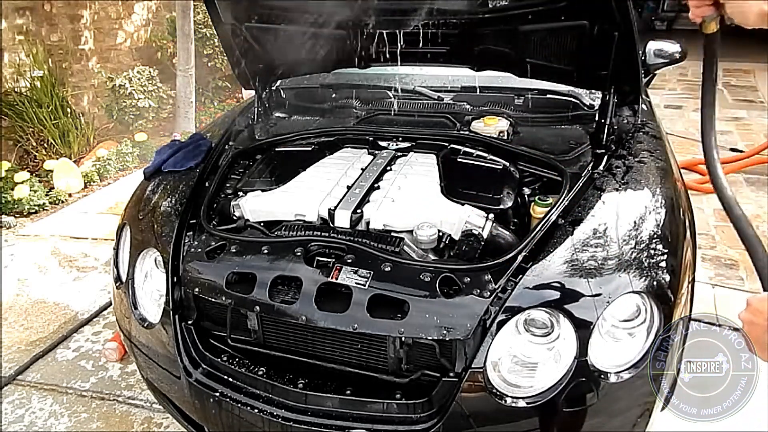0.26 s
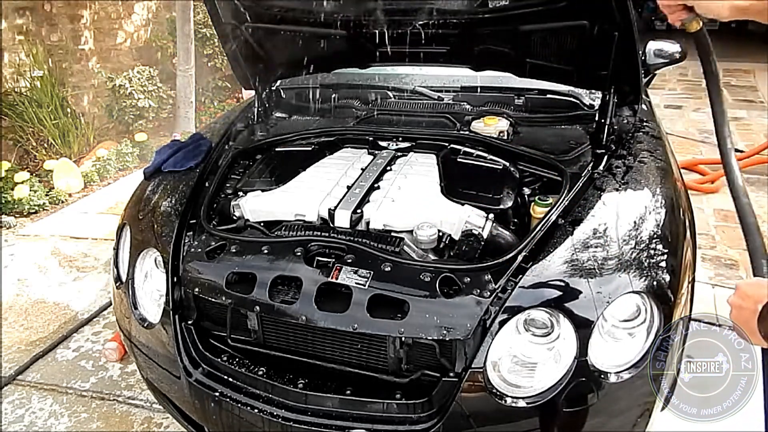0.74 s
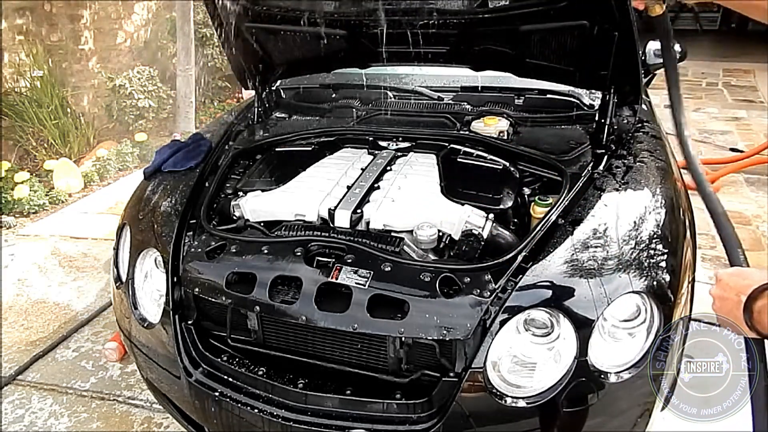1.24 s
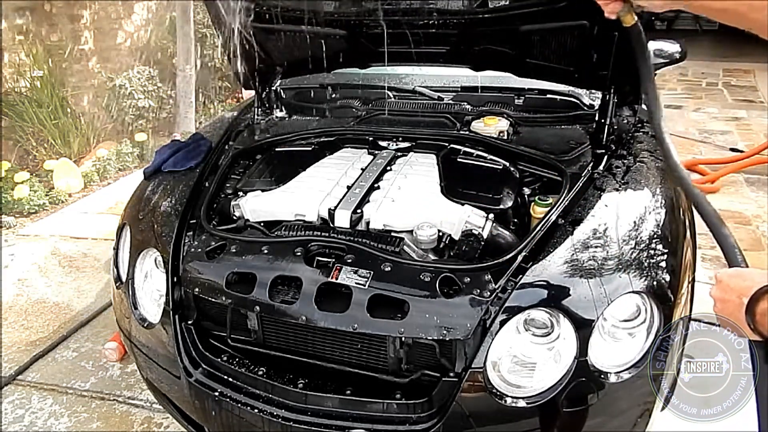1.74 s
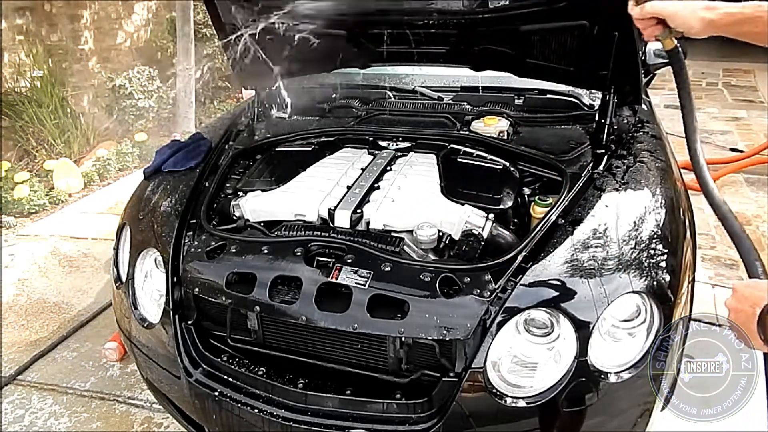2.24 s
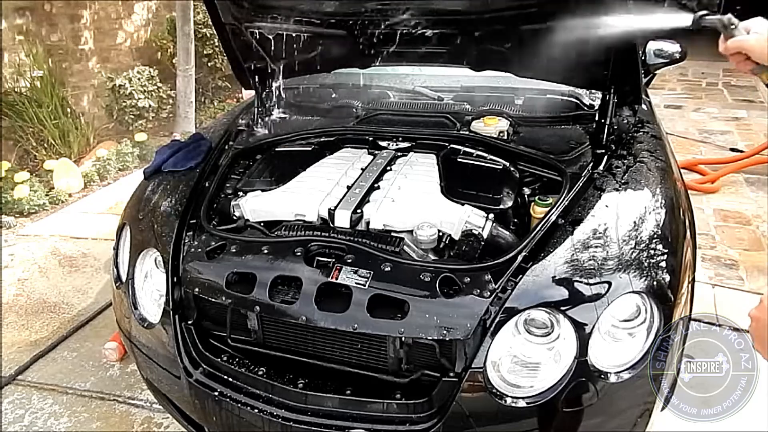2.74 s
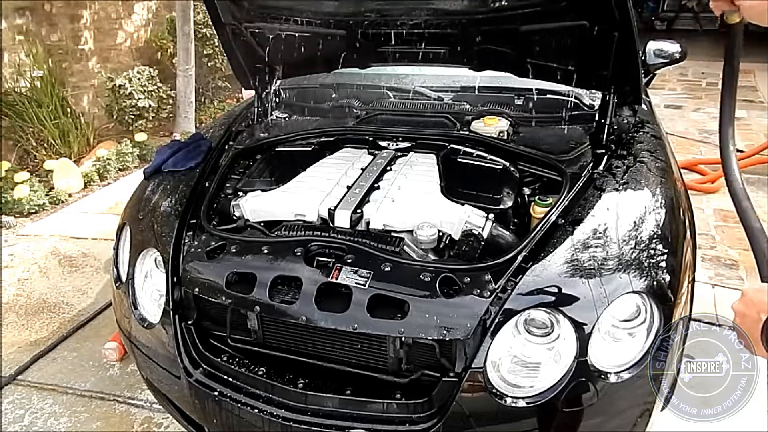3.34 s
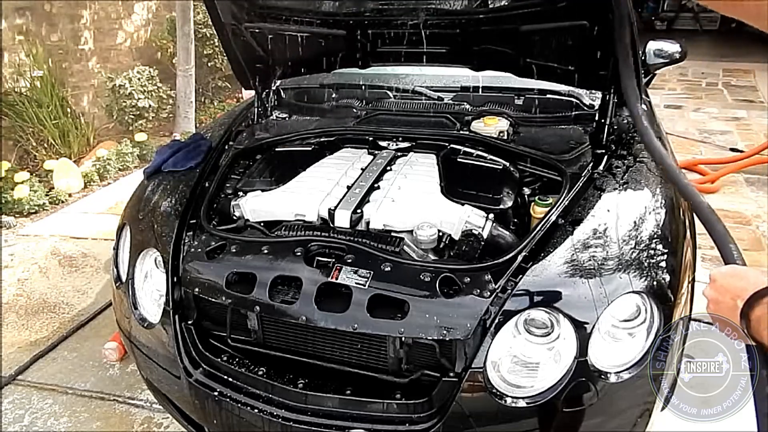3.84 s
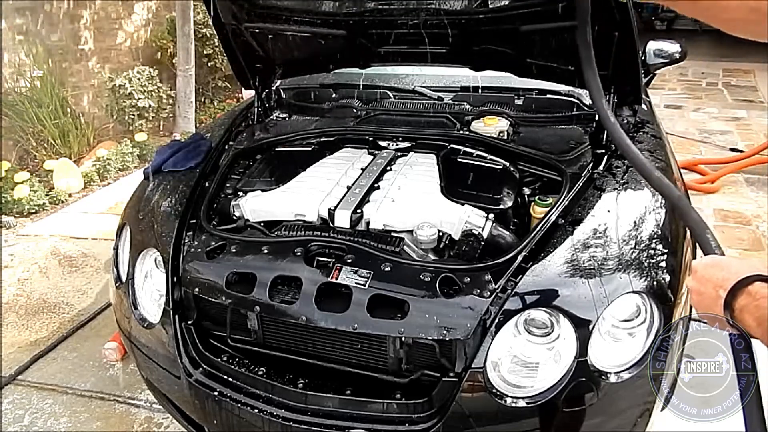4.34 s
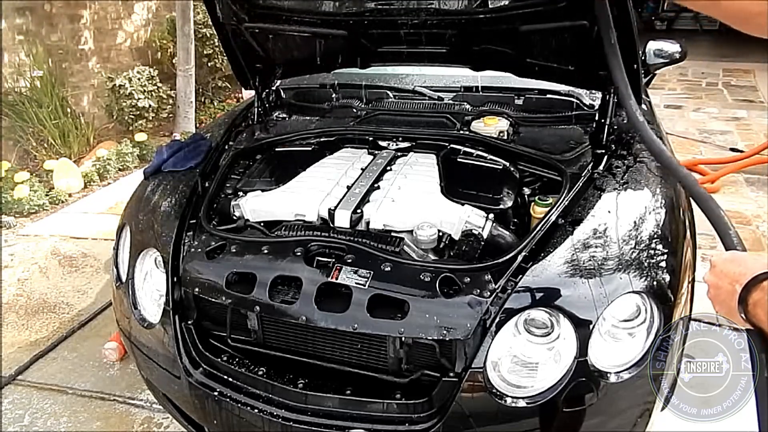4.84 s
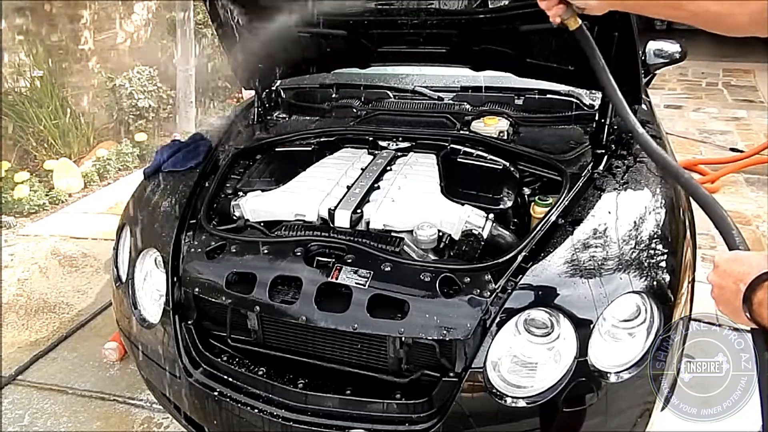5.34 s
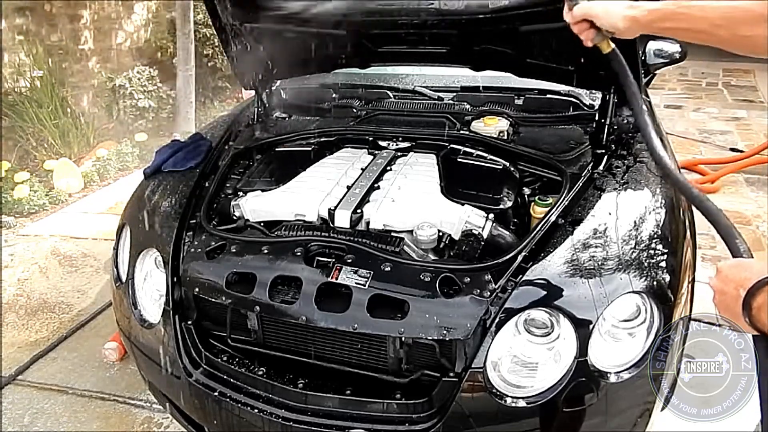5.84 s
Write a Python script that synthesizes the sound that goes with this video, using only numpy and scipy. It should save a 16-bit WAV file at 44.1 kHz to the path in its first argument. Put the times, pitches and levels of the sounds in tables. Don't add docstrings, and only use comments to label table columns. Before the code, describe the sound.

Continuous pressurised water strikes thin ribbed sheet metal in a driveway, heard close up. The hiss is rough and uneven, with quick swells as the jet hits pockets and short drops as it slips past gaps. The hollow panel drums and sings briefly in watery, unsteady tones. Early on there is more low boom; later it is brighter and more broken, with a few fat drops near the end.

```python
import sys
import numpy as np
from scipy import signal
from scipy.fft import rfft, irfft, next_fast_len
from scipy.io import wavfile
from scipy.ndimage import uniform_filter1d, map_coordinates

SR = 44100
rng = np.random.default_rng(int(sys.argv[2]) if len(sys.argv) > 2 else 0)


def convert_level_to_amplitude(level_db):
    exponent = np.asarray(level_db, float) / 20
    return 10 ** exponent


def store_pcm(level_fs):
    pcm = np.round(np.clip(level_fs, -1, 1) * 32767).astype(np.int16)
    wavfile.write(sys.argv[1], SR, np.atleast_2d(pcm).T)


N = 268348

# time in seconds, then force, hardness of impact,
# drive of the sheet and opening to the bay, all in dB.
JET_SWEEP = [(0.0, -1.4, 1.5, 4, 14.5), (0.4, 3.5, -0.7, 3, 7.5), (0.8, 0.2, -3.5, 1.5, 8),
             (1.2, 2.5, 0, 2, 7.5), (1.6, 1.5, 0, 2.5, 5), (2.0, 0.1, 1.6, 4, 14),
             (2.4, 4.5, -1.4, -3, 3.5), (2.8, -3, 1.2, 0.5, 3), (3.15, 1.5, 3.5, 0.5, -5),
             (3.55, -8.5, 0, -0.5, -2), (3.9, -0.5, 0, -2.5, -3.5), (4.2, 2, 0, 3, -4.5),
             (4.45, 1.5, -1, -3.5, -4), (4.75, 4.5, -1.4, -2.5, -4), (5.1, -3, -1, 4, -1.5),
             (5.4, 4, -0.5, -2.5, -12), (5.7, -4.5, 1.3, -2, -8), (6.08, 1.5, -1, -2.5, -6)]
# middle in seconds, length in seconds, gain in dB,
# depth in dB (into a pocket +, glancing -).
STRIKES = [(0.436, 0.011, 1.3, 7), (0.46, 0.07, 0.28, 0.5), (0.614, 0.018, 2.6, 3), (0.713, 0.18, 2.2, 0.5),
           (0.803, 0.016, 4, 10), (0.923, 0.016, 1.2, 4), (1.003, 0.05, 1.1, 0.5), (1.704, 0.018, 1.4, 8),
           (1.995, 0.068, 2.2, 0), (2.345, 0.028, 0.9, -2.5), (2.589, 0.018, 1.4, 5), (2.639, 0.19, 2, 2),
           (2.724, 0.12, 1.7, 3.5), (2.913, 0.02, 2.8, 3.4), (3.093, 0.083, 1.4, 2.5),
           (3.273, 0.022, 1.9, 0), (3.467, 0.076, 4.2, 2.5), (3.697, 0.17, 0.98, 4), (4.136, 0.018, 1.8, 3),
           (4.265, 0.088, 2.2, 5), (4.43, 0.072, 2.2, 2.5), (4.5, 0.016, 1.2, 8), (4.595, 0.07, 0.1, 4),
           (4.704, 0.028, 2.2, 3.5), (4.8, 0.053, 0.99, 2.5), (4.944, 0.044, 4, 1.5), (5.093, 0.11, 3.8, 5),
           (5.2, 0.05, 0.67, 0.5), (5.243, 0.018, 2.4, 8), (5.338, 0.12, 0.49, 7.5), (5.612, 0.068, 4.7, 8),
           (5.665, 0.024, 1.6, -2), (5.782, 0.022, 6.2, 7), (5.822, 0.033, 1.2, -6.5),
           (5.86, 0.026, 1.2, 8), (5.981, 0.015, 2.9, 1), (6.021, 0.012, 3.2, 8)]
# middle in seconds, length in seconds, gain and depth in dB.
SLIPS = [(0.11, 0.022, -2.5, 3), (0.155, 0.071, -2, -10), (0.309, 0.02, -2.5, -3), (0.374, 0.086, -3, -6),
         (0.509, 0.017, -3, -6), (0.84, 0.031, 0, -4), (0.885, 0.015, -2.5, -5), (1.073, 0.062, -1.5, -5.5),
         (1.257, 0.033, -2.5, -6), (1.382, 0.062, -1, -4), (1.412, 0.09, -1.5, -1),
         (1.591, 0.045, -2.5, -1), (1.766, 0.064, -4, -5.5), (1.821, 0.17, -1, 0), (2.035, 0.032, -2.5, -3),
         (2.625, 0.036, -2, -3), (2.08, 0.14, -3, -2), (2.295, 0.063, -1.5, -2), (0.778, 0.022, -1.5, -5),
         (2.38, 0.022, -1.5, 6), (2.479, 0.08, -2, -0.5), (2.77, 0.076, -1.4, -2.5),
         (2.799, 0.02, -1.5, -6), (2.873, 0.023, -3.5, -4), (3.028, 0.05, -1, -4), (3.332, 0.11, -0.5, -1),
         (3.352, 0.1, -2, -6), (3.517, 0.064, 0.5, -6), (3.567, 0.05, 0.7, -0.5), (3.966, 0.1, -2, -4),
         (4.168, 0.018, -3.5, -1), (4.36, 0.21, -4.5, -4), (4.884, 0.11, -1.5, -4.5),
         (5.165, 0.016, -2, -3), (5.283, 0.02, -2, 2), (5.468, 0.079, -1.5, 1.5), (5.45, 0.07, -0.5, -5),
         (5.535, 0.04, 1, -2), (2.455, 0.025, -2, -1), (5.49, 0.19, 0.5, 1), (5.69, 0.022, -2.5, -3),
         (5.717, 0.16, -0.5, 4), (5.897, 0.09, -3, 3), (5.905, 0.043, -3, -8), (6.052, 0.02, -3.5, 0)]
# level in dB, then its shares (dB per dB) of hardness,
# sheet drive, bay opening, gain of a crossing and depth of a crossing.
FOLLOWS = dict(rumble=(-47.5, -1.2, 0.45, 0.2, 0.3, 0), boom=(-46, 0, 0, 0.98, 0.4, 0.1),
           drum=(-31, -0.6, 1.4, 0, 0.74, 0.18), hollow=(-22, -0.13, 1.28, 0, 0.46, 0.58),
           splash=(-17, 1.08, 0.65, 0, 1.54, 0.23), spatter=(-16.5, 1.29, 0, 0, 1.6, -0.23),
           fizz=(-13, 0.5, 0, 0, 1.48, -0.47))
# time in seconds, left minus right in dB.
AIM = [
    (0.0, -2.0),
    (0.22, -1.5),
    (2.1, -1),
    (2.85, -2.5),
    (5.47, -0.5),
    (6.08, -2),
]
# time in seconds, lead of the left in microseconds.
LEFT_LEAD = [(.2, -11), (1.8, 17), (2.2, 6), (2.6, -30), (3.0, -44), (3.4, -28), (3.8, 14), (4.2, 27),
             (4.6, 5), (5.4, 27), (6.08, 19)]

# frequency in Hz, density in dB per Hz.
RIB_COLOUR = [(500, -35), (1100, -49), (1400, -5), (1700, 2.5), (2000, 5.5), (2400, 3), (2900, -4),
              (5000, -20.5)]
# frequency in Hz, density in dB per Hz.
SPATTER_COLOUR = [(1200, -78), (2200, -10), (2900, -0.5), (4200, 1), (5000, -4.5), (6200, -9.5),
                  (8000, -19), (12000, -58)]
# frequency in Hz, density in dB per Hz.
FIZZ_COLOUR = [(2500, -63), (4800, -10), (6500, -6), (8200, -2.5), (10000, -3), (12000, -6), (14000, -11),
               (16000, -16.5), (20000, -36)]
# middle in seconds, length in seconds, level in dB.
FANS = [(1.02, .05, -18), (1.205, .05, -21), (1.355, .06, -26), (1.973, .07, -27), (2.415, .03, -14),
        (0.342, .09, -21), (2.56, 0.034, -12), (2.69, .07, -29), (3.197, 0.2, -12), (3.446, 0.091, -16),
        (4.127, .06, -23), (5.407, 0.055, -25), (5.66, 0.046, -14.5)]
# frequency in Hz, density in dB per Hz.
FAN_COLOUR = [(2000, -52), (3300, -1.5), (4000, -3), (5600, -1), (6300, -12), (9000, -50)]
# start in seconds, peak in dB, ring in Hz.
FAT_DROPS = [
    (3.7975, -3, 3290),
    (5.984, -7, 2870),
    (6.02, -5, 1770),
]

# peak time in seconds, pitch in Hz, peak in dB, length in seconds.
POCKET_RINGS = [(0.622, 2080, -15, 0.034), (0.668, 1215, -32, 0.15), (0.714, 1950, -13, 0.037),
                (1.187, 2350, -13, 0.037), (1.37, 2330, -13, 0.047), (1.457, 1200, -16, 0.03),
                (1.528, 1700, -11.5, 0.025), (1.829, 1500, -15.5, 0.062), (1.846, 1150, -12, 0.031),
                (1.974, 2230, -19, 0.054), (1.997, 2620, -16, 0.056), (2.55, 3950, -16, 0.052),
                (2.595, 1540, -15.5, 0.068), (2.666, 2265, -14, 0.05), (2.836, 1930, -18, 0.034),
                (3.053, 2140, -6, 0.031), (3.125, 2103, -10, 0.035), (3.21, 1924, -20, 0.087),
                (3.453, 1757, -13, 0.055), (4.037, 2000, -12.5, 0.023), (4.11, 3310, -15, 0.051),
                (4.132, 2313, -4.5, 0.016), (4.498, 1554, -18.5, 0.082), (4.963, 2350, -16, 0.072),
                (5.02, 1670, -19, 0.053), (5.1, 1330, -18, 0.085), (5.599, 1870, -8, 0.052),
                (5.61, 2290, -12.5, 0.076), (6.028, 1780, -14.5, 0.043)]
# peak time in seconds, pitch in Hz, peak in dB.
CHIRPS = [(0.0, 1680, -18), (0.078, 1630, -17), (0.248, 2025, -14), (0.253, 2250, -21), (0.283, 1880, -18),
          (0.435, 1675, -16), (0.435, 2020, -16), (0.47, 2090, -16), (0.492, 1820, -21), (0.718, 1550, -13),
          (0.919, 1790, -17), (1.189, 1794, -19), (1.297, 2070, -21), (1.332, 1536, -18), (1.35, 2100, -15),
          (1.38, 1952, -19), (1.389, 1650, -18.5), (1.641, 1670, -23), (1.715, 2210, -18),
          (1.802, 2150, -15), (1.881, 2080, -14), (1.968, 1810, -12), (1.977, 2230, -23),
          (2.164, 1740, -15), (2.595, 2150, -15), (2.651, 1960, -23), (2.908, 2280, -27),
          (3.113, 1790, -19), (3.122, 3870, -15), (3.165, 3680, -18), (3.191, 3540, -24),
          (3.261, 4000, -20), (3.283, 1952, -19), (3.47, 3980, -17), (4.232, 3400, -13), (4.236, 1900, -21),
          (5.094, 1847, -14), (5.103, 2670, -18), (5.124, 2380, -15), (5.364, 2110, -19),
          (5.399, 3215, -16), (5.595, 2810, -13), (5.64, 1904, -13), (5.59, 2087, -14), (5.616, 1650, -15),
          (6.021, 1746, -15)]
# peak time in seconds, pitch in Hz, peak in dB.
HUMS = [(0.614, 1317, -13), (0.668, 1170, -11), (1.227, 1095, -15), (1.312, 1290, -15), (1.701, 1390, -20),
        (1.721, 1230, -19), (2.719, 890, -18), (2.918, 896, -19), (2.943, 1285, -19), (3.118, 838, -16),
        (3.273, 1165, -20), (3.672, 735, -25), (4.195, 1417, -22), (4.804, 700, -22), (4.959, 643, -21),
        (5.587, 1160, -20)]
# peak time in seconds, pitch in Hz, peak in dB.
WARBLES = [(0.244, 1248, -28), (0.283, 1330, -18), (0.322, 1110, -23), (0.331, 810, -20),
           (0.435, 1184, -18), (0.448, 1260, -16), (0.54, 1277, -16), (0.666, 1210, -16), (0.731, 990, -23),
           (0.749, 1460, -14), (0.923, 1450, -27), (0.927, 1230, -19), (1.533, 1250, -23),
           (1.994, 1005, -19), (2.247, 1160, -21), (2.608, 1370, -25), (3.196, 1480, -17),
           (4.127, 1300, -21), (4.132, 1064, -20), (4.132, 1140, -18), (4.197, 1400, -17),
           (4.227, 1260, -17), (4.241, 1475, -20), (4.245, 1110, -18), (4.728, 1449, -20),
           (5.059, 1227, -18), (5.238, 1200, -21), (5.32, 1250, -18), (5.342, 930, -22), (5.381, 1010, -20)]
# peak time in seconds, pitch in Hz, peak in dB, length in seconds.
GURGLES = [(0.016, 400, -27, 0.04), (0.238, 467, -16.5, 0.022), (0.308, 394, -18, 0.035),
           (0.475, 422, -22.5, 0.08), (0.62, 430, -16.5, 0.038), (0.73, 340, -21, 0.048),
           (0.753, 393, -13.5, 0.014), (0.941, 386, -13, 0.032), (1.157, 421, -14.5, 0.034),
           (1.269, 429, -26, 0.082), (1.327, 433, -10.5, 0.017), (1.337, 342, -22, 0.03),
           (1.503, 370, -22.5, 0.06), (1.689, 447, -18.5, 0.037), (1.84, 314, -28.5, 0.073),
           (2.218, 434, -21, 0.032), (2.27, 388, -27, 0.045), (2.694, 455, -21.5, 0.047),
           (2.913, 398, -17, 0.021), (4.151, 507, -24.5, 0.085), (4.246, 460, -18, 0.05),
           (4.981, 468, -15.5, 0.015), (5.074, 452, -19.5, 0.039), (5.114, 520, -19, 0.033),
           (5.153, 443, -19.5, 0.069), (5.24, 392, -22, 0.075), (5.313, 360, -24, 0.045),
           (5.37, 330, -25.5, 0.057), (5.375, 406, -18.5, 0.032)]
# peak time in seconds, pitch in Hz, peak in dB.
MURMURS = [(0.221, 685, -29), (0.401, 385, -26), (2.676, 594, -25), (2.85, 419, -30), (2.908, 556, -31),
           (3.077, 366, -28.5), (3.088, 445, -27), (3.158, 413, -32), (3.651, 583, -30), (0.87, 447, -24),
           (3.831, 577, -31), (4.11, 645, -25), (4.406, 597, -32), (4.656, 540, -28), (4.714, 670, -24),
           (5.097, 635.4, -23), (5.592, 450, -31), (5.375, 686, -34), (5.381, 552, -26), (5.776, 416, -31),
           (5.944, 646, -34)]
# peak time in seconds, pitch in Hz, peak in dB, length in seconds.
BOOMS = [
    (0.221, 185, -32, 0.1),
    (0.418, 151, -34, 0.19),
    (0.586, 185, -31.5, 0.19),
    (0.975, 151, -33, 0.13),
    (1.434, 155.9, -33, 0.064),
    (1.931, 206, -32, 0.1),
    (2.043, 156, -36, 0.088),
    (2.267, 203, -36, 0.078),
]

# frequency in Hz, density in dB per Hz.
PANEL_COLOUR = [(100, -60), (240, -23.5), (310, -8.5), (350, -4.5), (420, -2), (465, -3), (495, -6.5),
                (600, -12), (1200, -78)]
# time in seconds, pitch in Hz.
SHEET_PITCH = [(0, 404), (.25, 445), (.35, 395), (.6, 425), (.75, 380), (.95, 385), (1.15, 430),
               (1.33, 444), (1.5, 380), (1.7, 445), (2.2, 428), (2.9, 421.3), (4.25, 458.4), (5.0, 464.5),
               (5.17, 449.6), (5.2, 397.4), (5.4, 346), (6.08, 425)]
# frequency in Hz, density in dB per Hz.
DEEP_COLOUR = [(200, -67), (420, -13.5), (550, -6), (800, -3.5), (950, -4), (1200, -27), (2000, -58)]
# frequency in Hz, density in dB per Hz.
THROAT_COLOUR = [(500, -55), (850, -19.5), (1050, -4), (1200, 0), (1400, -0.5), (1800, -3.5), (3500, -54)]
# time in seconds, upper over lower modes in dB.
MOUTH = [(0, 1.5), (.3, 1.5), (.5, 1), (.82, 2), (1.05, -0.5), (1.5, 1), (2, 0), (2.5, -1), (3, -1),
         (3.4, 1.5), (3.7, -3), (4, -4.5), (4.25, -3), (4.5, -3), (4.8, -5), (5.2, 1), (5.6, 2), (6.08, -7)]
# frequency in Hz, density in dB per Hz.
BAY_COLOUR = [(60, -52), (125, -9), (142, -4.5), (151, -2.5), (162, -3), (188, -1), (205, -2.5), (235, -13),
              (300, -10), (500, -57)]
# frequency in Hz, density in dB per Hz.
RUMBLE_COLOUR = [(10, -22), (30, -6), (60, -1.5), (110, 3), (140, -21), (250, -46)]

# frequency in Hz, correlation from 0 to 1.
ALIKE = [(30, 0.7), (70, 0.7), (140, 0.84), (300, 0.87), (640, 0.89), (1400, 0.79), (2500, 0.56),
         (5000, 0.29), (9000, 0.36), (15000, 0.33)]
# frequency in Hz, left minus right in dB.
PORT_TILT = [(30, -.3), (80, 5.5), (200, -0.5), (700, 0.7), (2500, -1), (5000, 0), (13000, 0)]
# centre in Hz, width in Hz.
NARROW_DIPS = [(2500, 87), (7500, 89)]


def jet_levels():
    force_db, *sweep = curves(JET_SWEEP)
    crossings = dwell(list(STRIKES) + list(SLIPS), edge_s=0.007)
    controls = np.array([np.ones(N), *sweep, *crossings])
    return {part: convert_level_to_amplitude(force_db + np.dot(shares, controls)) for part, shares in FOLLOWS.items()}


def spray(level, flutter):
    pockets = struck(droplets(scatter_db=4.5), 1100, 3220, 35, scatter_db=1.7, count=50)
    splash = level["splash"] * convert_level_to_amplitude(0.94 * flutter + 0.096 * wobble(33)) * spread(pockets, RIB_COLOUR)
    film = level["splash"] * convert_level_to_amplitude(-8.0 + 0.85 * flutter) * bubbles(count=2000)

    edges = struck(droplets(scatter_db=3), 2440, 7080, 29, scatter_db=2.5, count=100)
    spatter = level["spatter"] * convert_level_to_amplitude(0.3 * flutter + 0.55 * wobble(35)) * spread(edges, SPATTER_COLOUR)
    treble_lift = 0.49 * level["spatter"] / convert_level_to_amplitude(-7.5)
    spatter = spatter + treble_lift * np.diff(spatter, prepend=0)

    mist = struck(droplets(scatter_db=5), 5420, 15840, 89, scatter_db=1.5, count=160)
    fizz = level["fizz"] * convert_level_to_amplitude(0.17 * flutter + 0.84 * wobble(45)) * spread(mist, FIZZ_COLOUR)

    fan_level = dwell([(s, length, convert_level_to_amplitude(db)) for s, length, db in FANS], edge_s=0.0088)[0]
    fan = fan_level * spread(edges[:, ::-1], FAN_COLOUR)
    return splash + film + spatter + fizz + fan


def bubbles(count):
    when, tone, size = rng.random((3, count))
    hz = 1800 * np.exp(.3 * rng.standard_normal(count))
    hz = np.clip(hz, 1000, 5000)[:, None]
    t = np.arange(SR // 50) / SR
    life_s = 16 * (.5 + tone[:, None]) / hz
    envelope = (t / life_s) * np.exp(-3 * t / life_s)
    ring = np.sin(2 * np.pi * hz * t * (1 + .02 * t / life_s)) * envelope
    ring = ring * convert_level_to_amplitude(10 * size)[:, None]
    place = (when * N).astype(int)[:, None] + np.arange(len(t))
    return unit(np.bincount(place.ravel(), ring.ravel(), N + len(t))[:N])


def fat_drops():
    out, t = np.zeros(N + SR), np.arange(SR // 20) / SR
    for s, db, hz in FAT_DROPS:
        ring = .6 * convert_level_to_amplitude(-60 * t / .05) * np.sin(2 * np.pi * hz * t)
        crack = .8 * convert_level_to_amplitude(-60 * t / .025) * rng.standard_normal(len(t))
        onset = 1 - np.exp(-t / .0008)
        out[round(s * SR):][:len(t)] += convert_level_to_amplitude(db) * (ring + crack) * onset
    return filtered(out[:N], lambda f: (1j * f / (500 + 1j * f)) ** 2)


def singing_modes():
    hollow = [(*hum, 0.035) for hum in HUMS]
    strong = rings(POCKET_RINGS + hollow, sharp=6.0, gain_db=2.5)
    deep = rings(GURGLES + BOOMS, sharp=5.5, gain_db=3.0)
    weak = []
    for table, length_s in [(MURMURS, 0.056), (WARBLES, 0.031), (CHIRPS, 0.036)]:
        weak += [(*row, length_s) for row in table]
    return strong + deep + rings(weak, sharp=7.2, gain_db=4.0, size=SR // 16)


def rings(table, sharp, gain_db, size=SR // 5):
    out, t = np.zeros(N + SR), np.arange(-size, size) / SR
    for s, hz, db, length in table:
        drift = np.cumsum(rng.standard_normal(len(t))) * 0.0012 * np.sqrt(hz)
        swell = np.exp(-sharp * (t / length) ** 2)
        out[round(s * SR):][:len(t)] += convert_level_to_amplitude(db + gain_db) * swell * np.sin(2 * np.pi * hz * t + drift)
    return out[size:][:N]


def hood(level, flutter):
    panel = struck(droplets(scatter_db=5.0), 290, 420, 5.8, scatter_db=2.5, count=14)
    drum = level["drum"] * convert_level_to_amplitude(2.7 * flutter) * spread(panel, PANEL_COLOUR)

    cavity = struck(droplets(scatter_db=2.5), 405, 1790, 20, scatter_db=2.0, count=40)
    open_db = curves(MOUTH)[0] / 2
    lower = convert_level_to_amplitude(-6 - open_db) * spread(cavity, DEEP_COLOUR)
    upper = convert_level_to_amplitude(-2 + open_db) * spread(cavity, THROAT_COLOUR)
    hollow = level["hollow"] * convert_level_to_amplitude(4.2 * flutter) * (lower + upper)

    boom = level["boom"] * convert_level_to_amplitude(0.45 * wobble(9)) * spread(droplets(scatter_db=-2.5), BAY_COLOUR)
    rumble = level["rumble"] * convert_level_to_amplitude(1.5 * wobble(6)) * spread(droplets(scatter_db=3), RUMBLE_COLOUR)
    return drum + hollow + boom + rumble


def held_modes(level):
    sheet = level["drum"] * convert_level_to_amplitude(-4.5 + 3.8 * wobble(22)) * drone(curves(SHEET_PITCH)[0], 9.96, 14)
    bay = level["boom"] * convert_level_to_amplitude(-6 + 0.8 * wobble(4.1)) * drone(151, 1.14, 6.04)
    return sheet + bay


def drone(hz, wander_hz, rate):
    return np.sin(2 * np.pi * np.cumsum(hz + wander_hz * wobble(rate)) / SR)


def droplets(scatter_db):
    return rng.standard_normal((2, N)) * convert_level_to_amplitude(scatter_db * rng.standard_normal((2, N)))


def struck(x, lo_hz, hi_hz, width_hz, scatter_db, count):
    hz, t, z = signal.stft(x, SR, nperseg=2048, noverlap=1536)
    pitch = lo_hz * (hi_hz / lo_hz) ** rng.random(count)
    shape = 1 / (1 + (2 * (hz[:, None] - pitch) / width_hz) ** 2)
    coupling = uniform_filter1d(rng.standard_normal((count, len(t))), size=5, axis=1)
    field = shape @ coupling / np.sqrt(np.sum(shape ** 2, axis=1, keepdims=True) / 5 + .02)
    return signal.istft(z * convert_level_to_amplitude(scatter_db * field), SR, nperseg=2048, noverlap=1536)[1][:, :N]


def spread(pair, colour):
    def mid_side(hz):
        turn = np.arccos(np.clip(along(ALIKE, hz), -1, 1)) / 2
        return convert_level_to_amplitude(along(colour, hz)) * [np.cos(turn), np.sin(turn)]
    mid, side = filtered(pair, mid_side)
    return unit(np.array([mid + side, mid - side]))


def dwell(rows, edge_s):
    t = np.arange(N // 20 + 1) * 20 / SR
    s, length, *cols = np.transpose(rows)[..., None]
    enter = np.tanh((t - s + length / 2) / edge_s)
    leave = np.tanh((t - s - length / 2) / edge_s)
    held = .5 * (enter - leave)
    return [np.interp(np.arange(N) / SR, t, np.sum(c * held, axis=0)) for c in cols]


def unit(x):
    return x / np.sqrt(np.mean(x ** 2) + 1e-20)


def along(points, hz):
    f, v = np.transpose(points)
    return np.interp(np.log(hz + 1), np.log(f + 1), v)


def curves(rows):
    s, *cols = np.transpose(rows)
    return [np.interp(np.arange(N) / SR, s, c) for c in cols]


def wobble(rate):
    return map_coordinates(rng.standard_normal(N // 100), [np.arange(N) * rate / SR])


def filtered(x, response):
    m = next_fast_len(N + SR // 2)
    return irfft(rfft(x, m) * response(np.fft.rfftfreq(m, 1 / SR)), m)[..., :N]


def placed(pair):
    hz, t, z = signal.stft(pair, SR, nperseg=512)
    lead_s = np.interp(t, *np.transpose(LEFT_LEAD)) / 1e6
    turn = np.exp(1j * np.pi * hz[:, None] * lead_s)
    return signal.istft(z * [turn, turn.conj()], SR, nperseg=512)[1][:, :N]


def scene():
    level, flutter = jet_levels(), 0.66 * wobble(30)
    water = spray(level, flutter) + fat_drops()
    metal = singing_modes() + hood(level, flutter) + held_modes(level)
    lean_db = curves(AIM)[0] / 2
    return placed((water + metal) * convert_level_to_amplitude(np.array([lean_db, -lean_db])))


def low_pass(x):
    return signal.sosfilt(signal.butter(12, 15780, fs=SR, output="sos"), x)


def record(dry):
    def microphone(f):
        dips = [(c * c - f * f) / (c * c - f * f + 1j * f * w) for c, w in NARROW_DIPS]
        ports = convert_level_to_amplitude(along(PORT_TILT, f) * [[.5], [-.5]])
        return np.prod(dips, axis=0) * ports
    overloaded = np.clip(filtered(dry, microphone), -1.01, 1.01)
    return low_pass(overloaded)


dry = scene()
out = record(dry)
store_pcm(out)
```